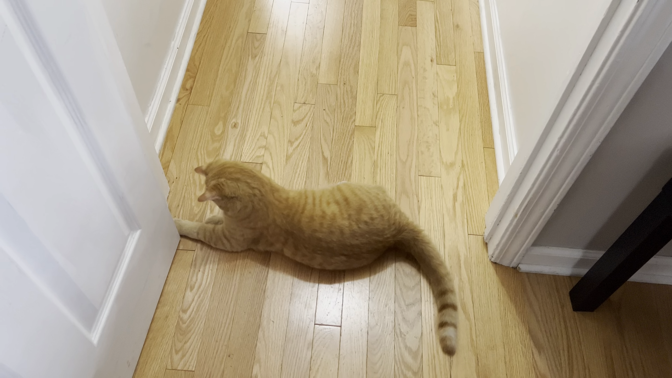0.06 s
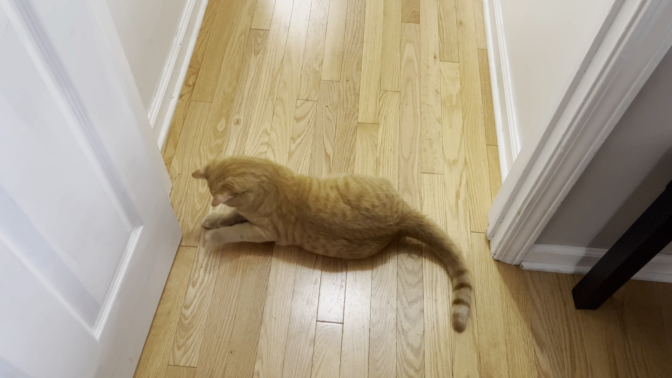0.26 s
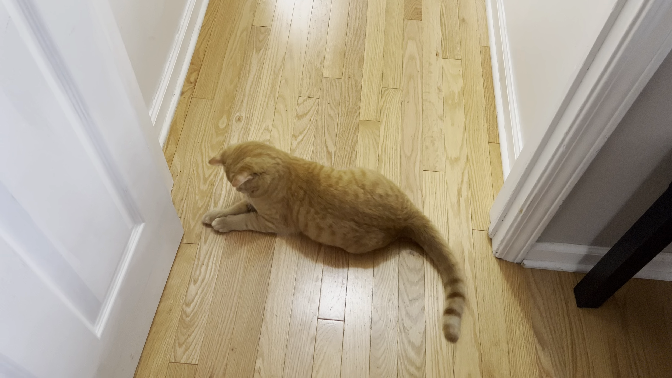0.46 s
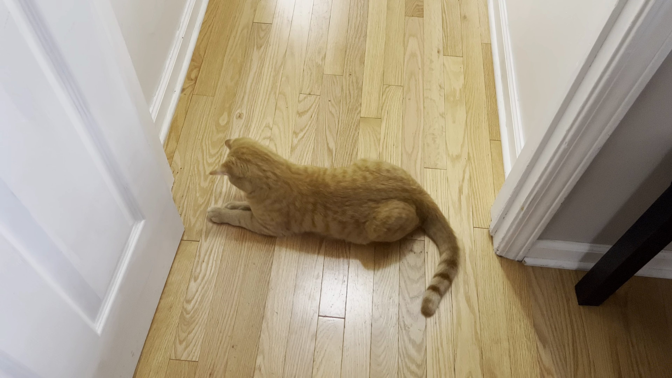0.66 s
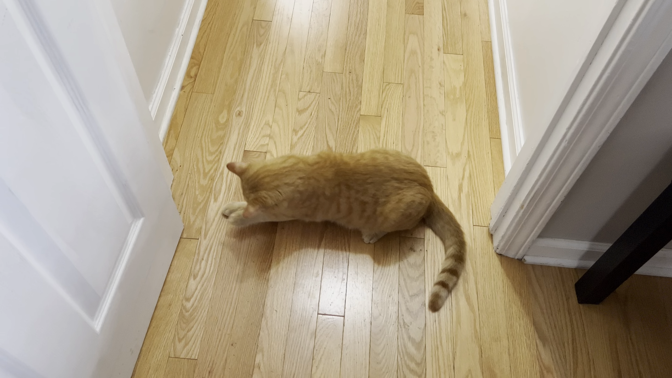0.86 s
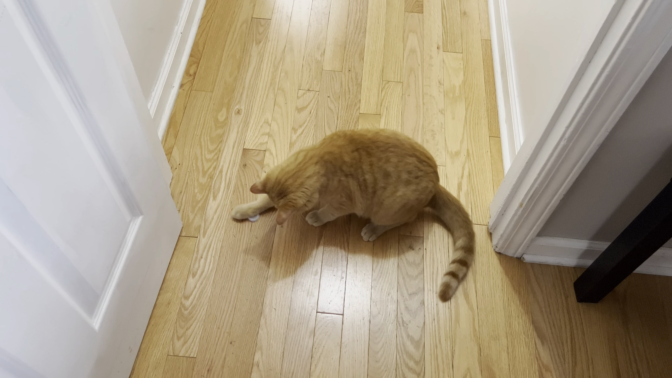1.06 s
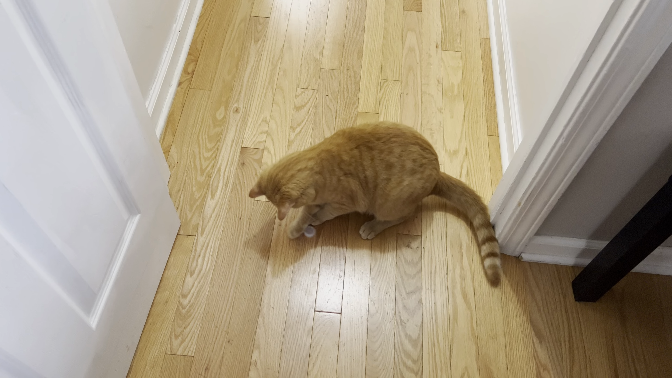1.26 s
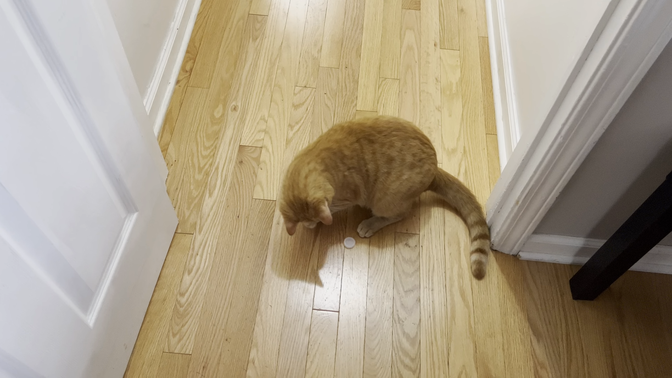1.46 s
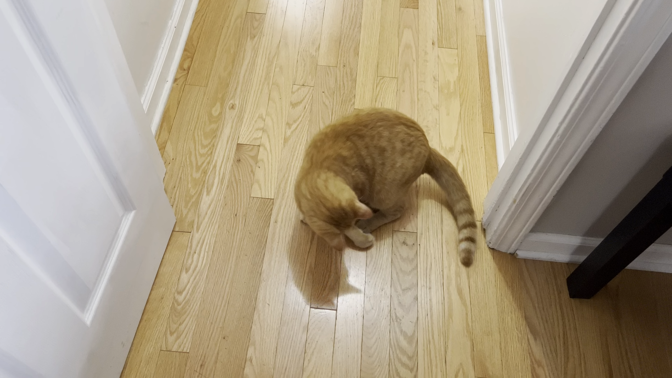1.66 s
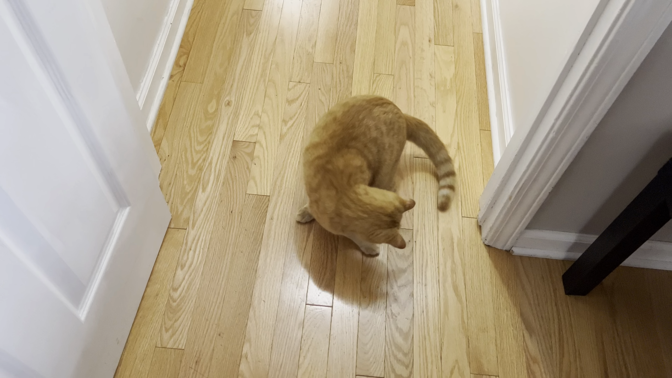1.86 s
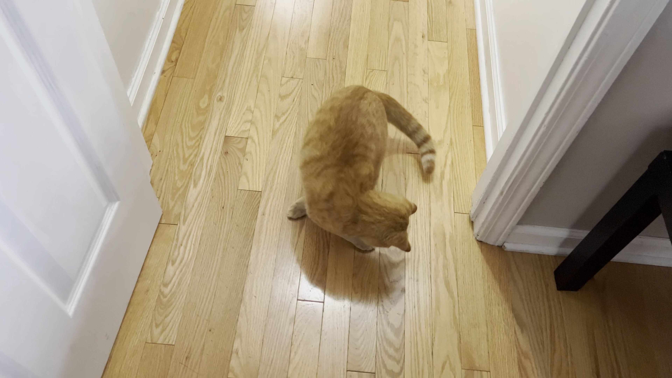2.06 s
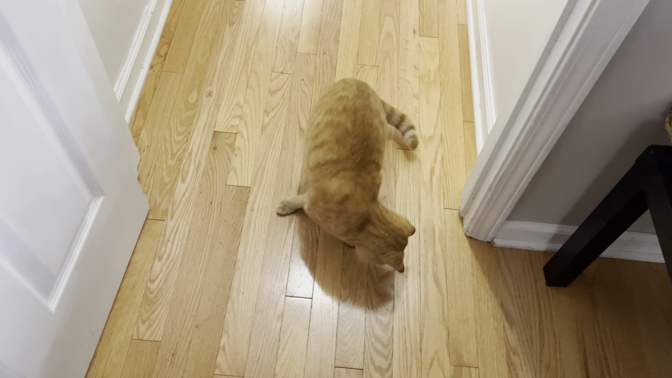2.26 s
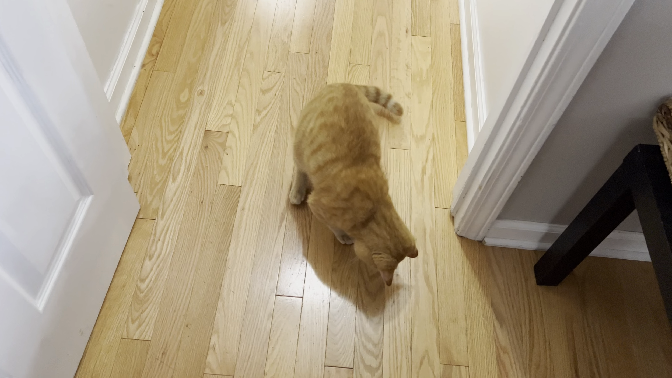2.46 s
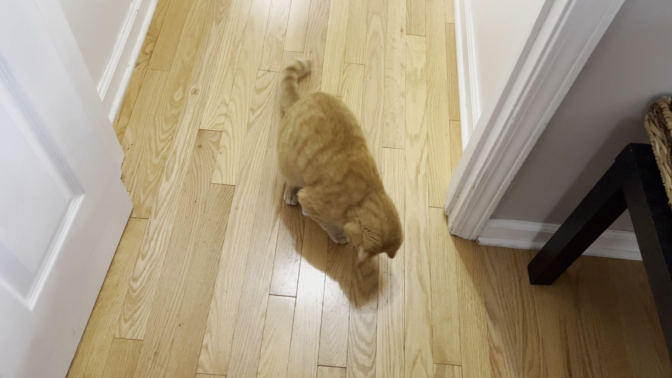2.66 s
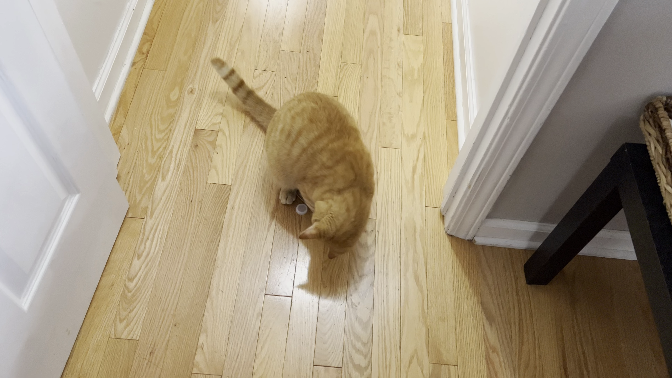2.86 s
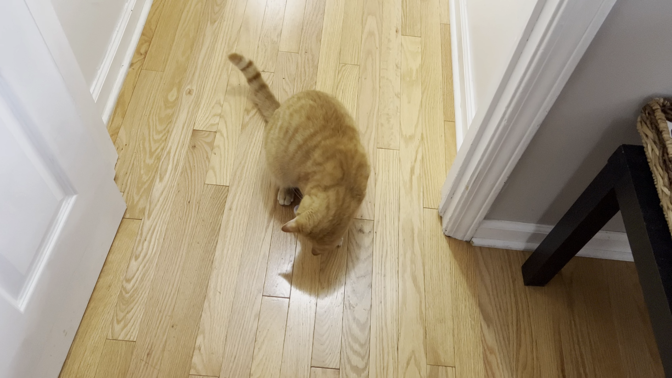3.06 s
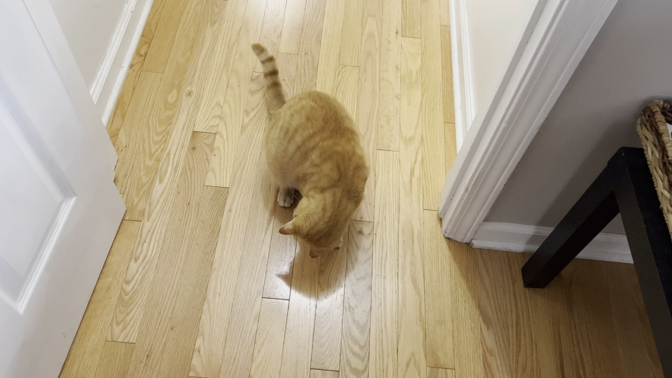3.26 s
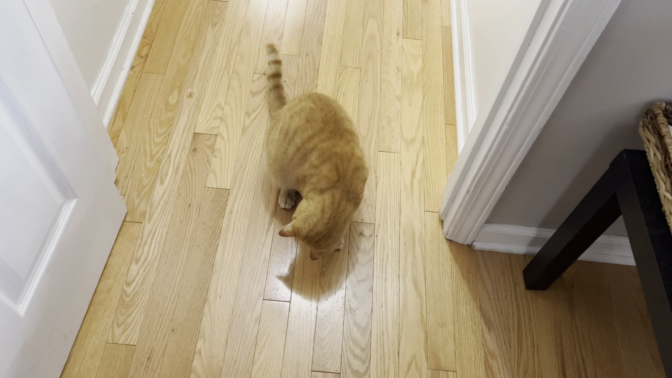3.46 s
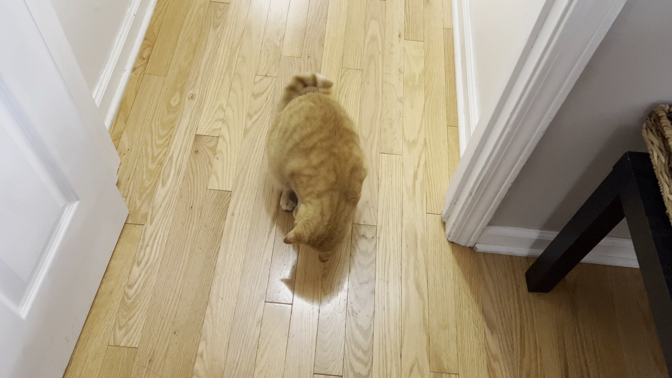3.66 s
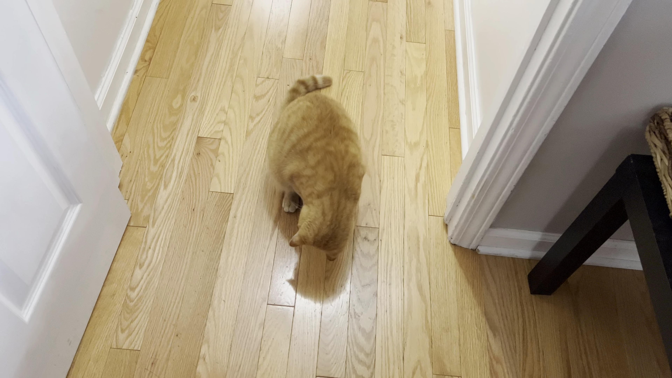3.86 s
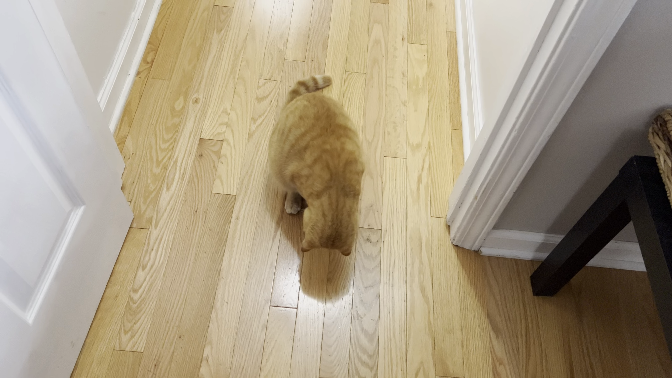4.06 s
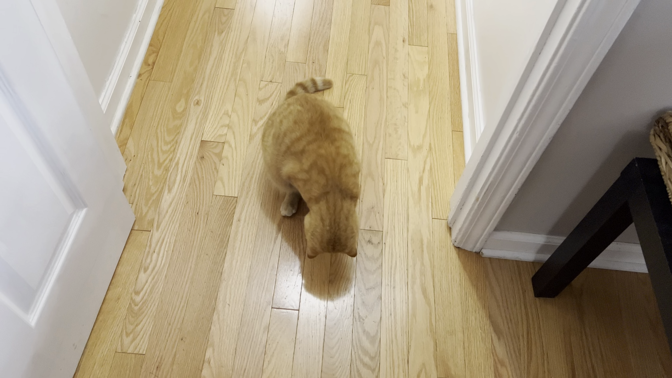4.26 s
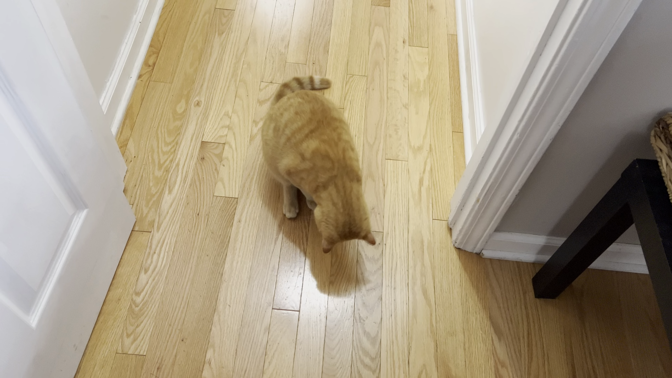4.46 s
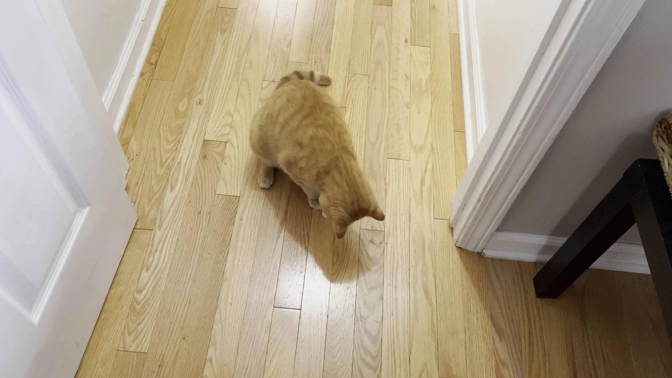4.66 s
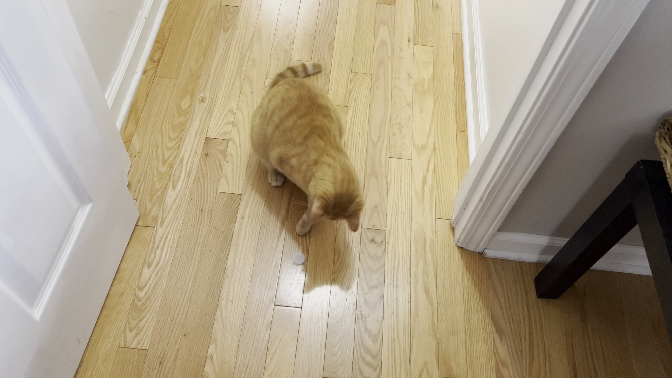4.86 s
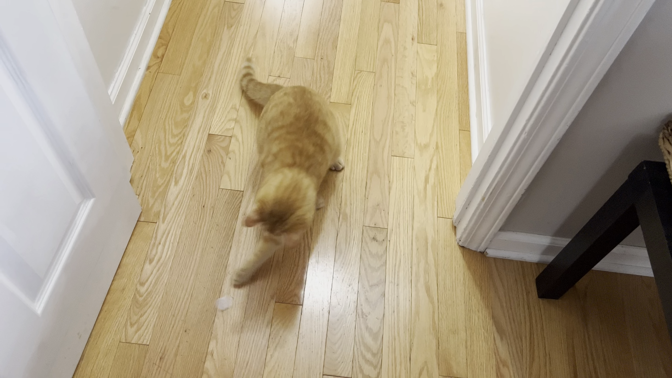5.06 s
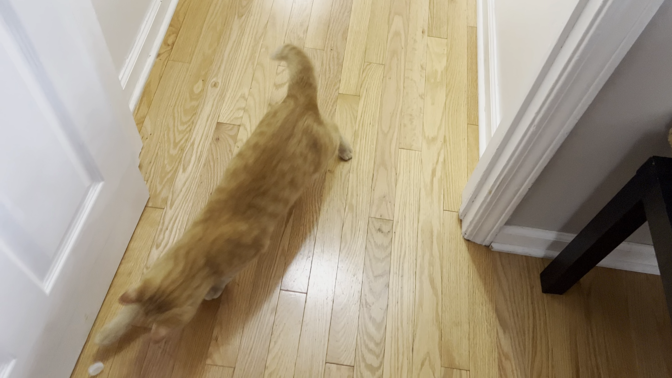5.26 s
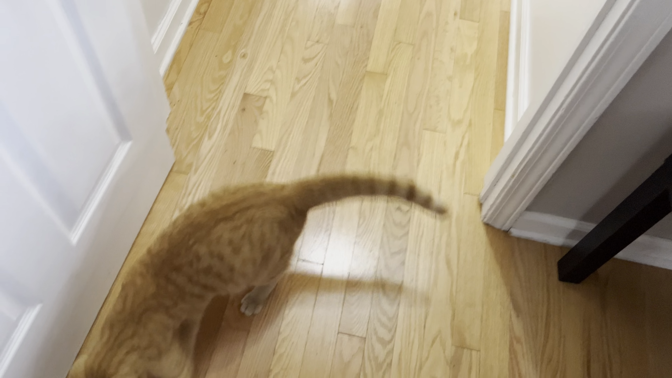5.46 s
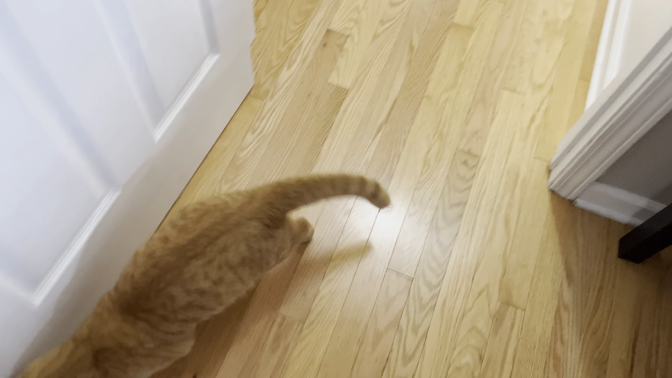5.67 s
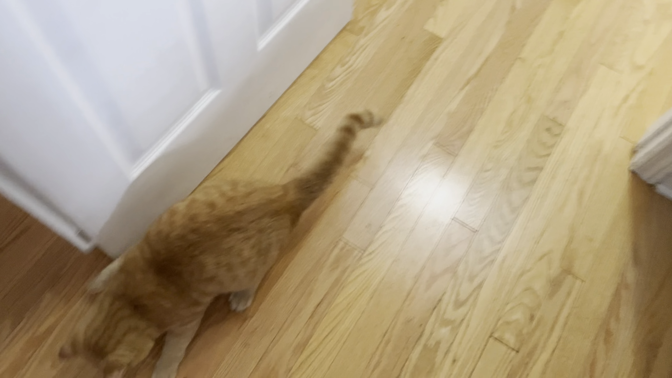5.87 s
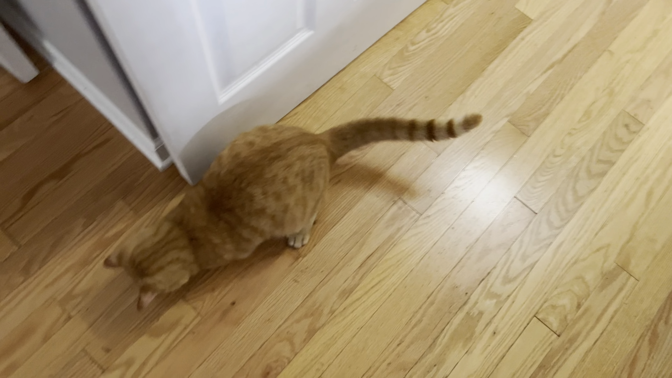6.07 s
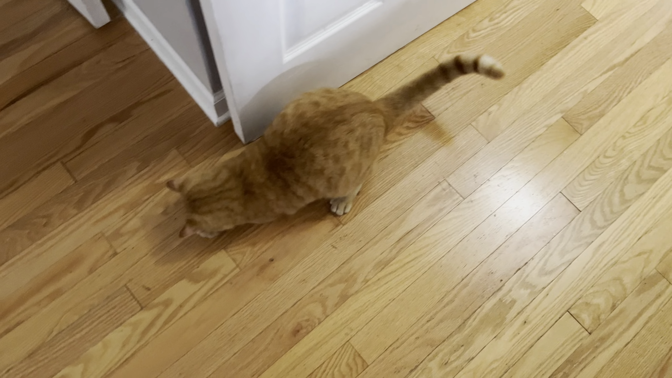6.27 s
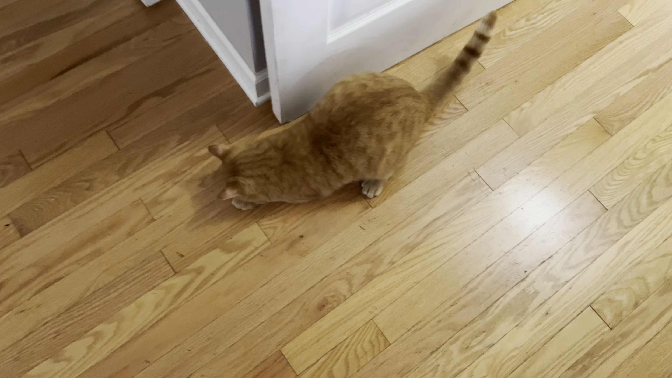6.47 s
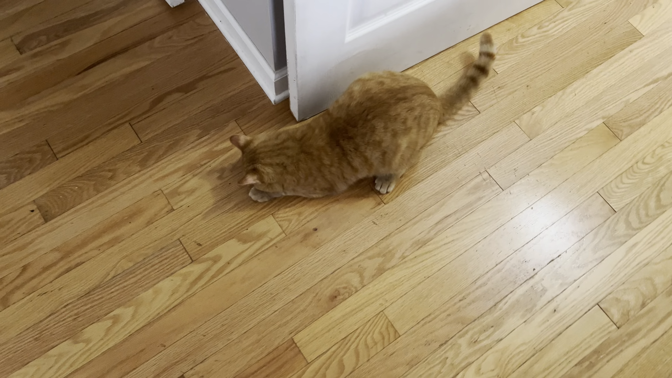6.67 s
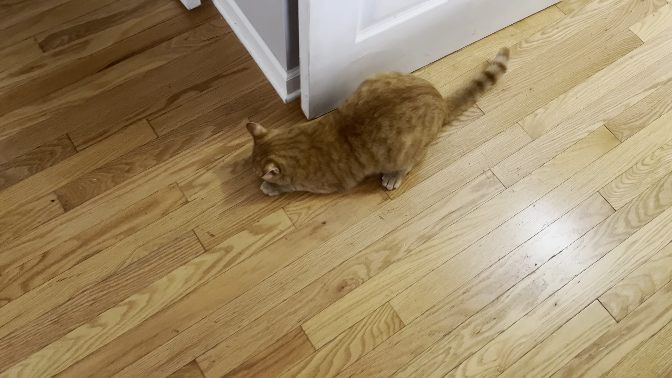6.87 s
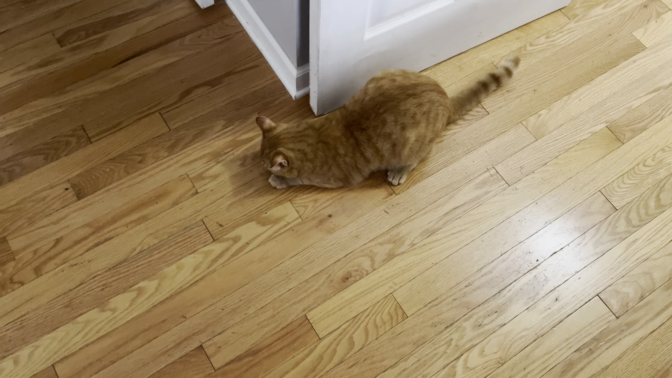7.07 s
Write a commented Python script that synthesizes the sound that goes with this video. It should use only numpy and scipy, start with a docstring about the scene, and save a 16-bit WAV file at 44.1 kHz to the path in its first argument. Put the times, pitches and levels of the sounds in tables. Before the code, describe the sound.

Indoors on bare floorboards, close to a handheld microphone, claws click and drag in brief bursts as a cat bats a hard plastic cap. The clicks are sparse and dry, with a short hallway echo. Late on, the cap skitters with a high ringing rattle and heavy paws drum on the wood in a pounce, followed by a few muted thuds and faint scuffs over low rumble and hiss.

```python
"""Cat and cap on a hardwood floor

A cat bats a small plastic cap about a hardwood hallway, near a hand-held phone. Claws tick and drag on the
boards as short blows and dense slips; the cap rattles and slides as a set of resonances; paws thump
in a pounce as damped low swings. The hallway answers with briefly decaying noise.
The house rumbles, the boards flex, and a fan hisses and whines as steady noise and a tone."""
import sys
import numpy as np
from scipy import signal
from scipy.fft import rfft, irfft, next_fast_len
from scipy.io import wavfile
from scipy.ndimage import map_coordinates

SR = 44100
rng = np.random.default_rng(int(sys.argv[2]) if len(sys.argv) > 2 else 0)


def waveform_to_disk(signal):
    """Save audio, clipped to [-1, 1], as 16-bit WAV at the path in sys.argv[1]."""
    frames = np.transpose(np.atleast_2d(signal))
    scaled = np.clip(frames, -1, 1) * 32767
    samples = np.round(scaled).astype(np.int16)
    wavfile.write(sys.argv[1], SR, samples)


N = 313917  # samples
TOP_HZ = 16600  # band limit
TICK_WET_DB = -6  # ticks' drive of the hallway

# Paw thumps. Each row: start in seconds, nominal level in dB, pitch in Hz, t60 in seconds,
# hollow knock in dB relative to that level before a fixed trim.
THUMPS = [(0.191, -59, 293, 0.33, -21), (0.324, -40, 153, 0.14, -16), (0.465, -55.5, 293, 0.53, -26),
          (0.53, -63, 293, 0.36, -28), (0.687, -46, 158, 0.16, -15), (0.71, -53, 293, 0.44, -22),
          (0.789, -56, 293, 0.39, -27), (0.85, -61.5, 293, 0.24, -30), (2.193, -54, 178, 0.34, -34),
          (2.213, -59, 230, 0.19, -30), (2.439, -54, 138, 0.39, -18), (2.905, -55, 230, 0.11, -32),
          (2.93, -55.5, 145.5, 0.18, -38), (3.415, -58, 181, 0.11, 2), (3.753, -58, 153, 0.087, 8.5),
          (3.775, -56.5, 118, 0.12, -1), (4.3, -53, 196, 0.13, -35), (4.325, -44, 145, 0.19, -45),
          (4.35, -47.5, 189, 0.14, -41), (4.656, -60.5, 113, 0.21, -27), (5.095, -46.5, 137, 0.12, -40),
          (5.235, -33.5, 370, 0.07, -11), (5.242, -30, 129, 0.07, -7.5), (5.375, -36.5, 219, 0.13, -21),
          (5.444, -32.5, 106, 0.18, -14), (5.451, -32, 278, 0.26, -15), (5.52, -36, 415, 0.068, -9),
          (5.582, -32, 285.7, 0.44, 0.5), (5.611, -27, 328, 0.17, -15), (5.666, -31, 111, 0.09, -15),
          (5.688, -36, 190, 0.19, -19), (5.781, -45, 389, 0.086, -5.5), (5.853, -37.5, 120, 0.086, -37),
          (5.87, -28.5, 149, 0.087, -45), (5.897, -50, 149, 0.17, -19), (5.938, -28.5, 222, 0.044, -13.5),
          (6.03, -41, 60.5, 0.25, -35), (6.291, -53, 60, 0.46, -31), (6.591, -36, 104, 0.18, -18.5),
          (6.688, -48.5, 367, 0.16, 1), (7.031, -49.5, 139, 0.059, -17)]
# Resonances of the floorboards. Each row: frequency in Hz, width in Hz, relative level in dB.
BOARD_MODES = [(141.4, 10, 4), (183.3, 29, 2.5), (244, 59, 5), (293, 54, 3), (322.2, 17, -4.5),
               (363, 22, -8.5), (457.5, 92, -5.5), (535.5, 27.6, -6), (880, 240, -2.5)]
# Spectrum of claw on wood. Each row: frequency in Hz, relative density in dB per Hz.
CLAW_SPECTRUM = [(290, -59.5), (500, -8.5), (642, -22.5), (981, -3.5), (1350, -3.5), (1670, -0.5),
                 (2200, -1.5), (3850, -5.5), (5000, -38.5), (6500, -56), (11000, -120)]
# Spectrum of rustle and crack. Each row: frequency in Hz, relative density in dB per Hz.
CRACK_SPECTRUM = [(2530, -20), (4300, -5.5), (4970, -3), (5320, -9), (6940, -13.5), (10500, -29.5),
                  (13600, -89.5), (22000, -120)]
# Fine treble of a sharp contact. Each row: frequency in Hz, relative density in dB per Hz.
FINE_SPECTRUM = [(8000, -60), (10500, -26), (11500, -13), (12500, -5), (13300, 0), (14200, -6),
                 (15400, -11), (16000, -26), (17000, -70)]
# Stereo width of the sound field. Each row: frequency in Hz, side minus mid in dB.
WIDTH = [(60, -17.5), (200, -14), (380, -5.5), (700, 2.5), (1300, 0.5), (2400, 1.5), (4400, 1.5),
         (6500, 0.5), (9500, 3), (11000, 17.5), (12500, -9), (15000, -16)]


def amp(db):
    """Decibel law: the gain of a level in dB."""
    return 10 ** (np.asarray(db) / 20)


def unit(x):
    """Normalisation by mean power: x at rms 1."""
    return x / np.sqrt(np.mean(x ** 2) + 1e-20)


def along(points, hz):
    """Interpolation of (Hz, value) points on a logarithmic frequency axis."""
    f, v = np.transpose(points)
    return np.interp(np.log(hz + 1), np.log(f + 1), v)


def curve(points):
    """Linear interpolation of (second, value) points, one value per sample."""
    s, v = np.transpose(points)
    return np.interp(np.arange(N) / SR, s, v)


def filtered(x, response):
    """Linear filtering: the spectrum of x times a complex response of frequency."""
    m = next_fast_len(N + SR // 2)
    return irfft(rfft(x, m) * response(np.fft.rfftfreq(m, 1 / SR)), m)[..., :N]


def through(x, h):
    """Convolution of x with an impulse response along time."""
    return signal.fftconvolve(np.atleast_2d(x), h[None], axes=1)[:, :N]


def causal(points, size=2048):
    """Minimum-phase impulse response of a spectrum by folding its cepstrum, at energy 1."""
    magnitude = amp(along(points, np.fft.rfftfreq(size, 1 / SR)))
    cepstrum = irfft(np.log(magnitude + 1e-5))
    cepstrum[1:size // 2] *= 2
    cepstrum[size // 2 + 1:] = 0
    h = irfft(np.exp(rfft(cepstrum)))
    return h / np.linalg.norm(h)


def ringing(modes, size=4096):
    """Modal superposition: damped sines of alternating sign, the wider the faster to decay, at energy 1."""
    t = np.arange(size) / SR
    h = np.zeros(size)
    for k, (hz, width_hz, db) in enumerate(modes):
        decay = np.exp(-np.pi * width_hz * t)
        h += (-1) ** k * amp(db) * np.sqrt(width_hz) * decay * np.sin(2 * np.pi * hz * t)
    return h / np.linalg.norm(h)


def noise(spectrum, width, db=0):
    """Coloured Gaussian noise, unrelated in mid and side; the mid's level may change in time."""
    white = rng.standard_normal((2, N))

    def colour(hz):
        mid_db = along(spectrum, hz)
        return amp([mid_db, mid_db + along(width, hz)])

    return filtered(white * amp(db), colour) / np.std(filtered(white, colour)[0])


def envelopes(start, hold, rise, fade, size=16):
    """Exponential relaxation, one row per event: it rises, holds and fades, in steps of size samples."""
    age = np.arange(0, N, size) / SR - start[:, None]
    hold, rise, fade = (np.reshape(v, (-1, 1)) for v in (hold, rise, fade))
    rising = 1 - np.exp(-np.maximum(age, 0) / rise)
    fading = np.exp(-np.maximum(age - hold, 0) / fade)
    return np.repeat(rising * fading, size, axis=1)[:, :N]


def house():
    """Stationary noise and tone: rumble and flexing boards of uneven level, steady fan hiss and thin whine."""
    # Rumble spectrum. Each row: frequency in Hz, relative density in dB per Hz.
    rumble_spectrum = [(13, -40.5), (22, -31.5), (33, -12.5), (49, 6.5), (64, 5), (108, -7), (130, -18),
                       (170, -20), (290, -120)]
    # House rumble. Each row: time in seconds, level in dB before its waver.
    rumble_levels = [(0.0, -66.5), (0.1, -60.5), (0.63, -54), (1.01, -57), (1.07, -63.5), (1.15, -52),
                     (1.49, -63), (1.9, -55), (1.96, -59.5), (2.7, -58), (2.91, -69), (2.95, -56),
                     (3.05, -66), (3.09, -55.5), (3.25, -64), (5.41, -58.5), (5.47, -47), (5.59, -61),
                     (5.67, -46), (5.79, -65), (5.89, -43.5), (6.24, -69), (6.32, -49.5), (6.56, -65),
                     (6.6, -53), (6.9, -65), (7.04, -62.5), (7.12, -67)]
    # Boards flexing as the cat shifts. Each row: time in seconds, level in dB before a fixed trim.
    weight_levels = [(0, -66.5), (.5, -56), (.85, -67), (1.0, -65), (1.4, -74), (1.9, -68.5), (2.6, -77),
                     (3.3, -83.5), (4.1, -78.5), (4.7, -78), (5.0, -80), (5.3, -55), (5.65, -44),
                     (6.0, -45), (6.2, -62), (6.5, -53), (6.75, -48), (6.92, -77), (7.12, -51)]
    # Fan and microphone hiss. Each row: frequency in Hz, relative density in dB per Hz.
    hiss_spectrum = [(71, -14.5), (120, -1.5), (167, -13), (227, -8.5), (372, -16), (610, -21.5),
                     (797, -24), (999, -11), (1250, -15), (1740, -3), (3100, -31), (4050, -23),
                     (4580, -31.5), (7350, -30.5), (16400, -55.5)]
    # Stereo width of the hiss. Each row: frequency in Hz, side minus mid in dB.
    hiss_width = [(60, -10.5), (110, 1.5), (200, -3), (380, -2.5), (700, 3.5), (1290, -1.5), (2380, 1.5),
                  (4400, -2.5), (8120, 1), (15000, -0.5)]
    # Fan whine. Each row: frequency in Hz, nominal level in dB.
    whine_tones = [(3957, -88.5)]
    waver_db, wavers_per_s, hiss_db = 1.5, 9, -70.5
    flex_db, flex_rise_s, flex_fade_s = -3, 0.0042, 0.039  # each thump flexes the boards; fade to 1/e

    waver = map_coordinates(rng.standard_normal(200), [np.arange(N) * wavers_per_s / SR])
    rumble = noise(rumble_spectrum, WIDTH, curve(rumble_levels) + waver_db * waver)

    start, thump_db = np.transpose(THUMPS)[:2]
    thump_energy = amp(thump_db + flex_db) ** 2 @ envelopes(start, 0, flex_rise_s, flex_fade_s) ** 2
    flex = np.sqrt(amp(curve(weight_levels)) ** 2 + thump_energy)
    creak_force = noise([(60, -44), (120, -0.5), (380, 0.5), (700, -3), (1500, -21.5)], WIDTH)
    boards = through(creak_force, ringing(BOARD_MODES))
    boards = amp(-8.0) * flex * boards / np.std(boards[0])

    phase = [[0], [1.3]]  # radians, mid and side
    whine = sum(amp(db + 2.5) * np.sin(2 * np.pi * hz * np.arange(N) / SR + phase) for hz, db in whine_tones)
    return rumble + boards + noise(hiss_spectrum, hiss_width, hiss_db) + whine


def scratches(pitch_hz, rate=650, cycles=1.84, spread=0.17, size=256):
    """Stick-slip: claw tips catch in the grain, giving short damped chirps scattered about a moving pitch."""
    start = np.sort(rng.integers(0, N, round(rate * N / SR)))  # rate per second
    bend, strength = rng.standard_normal((2, len(start), 1))
    age = np.arange(size) / SR * pitch_hz[start, None] * np.exp(spread * bend)  # in cycles
    chirps = strength * np.sin(2 * np.pi * age) * age * np.exp(-age / cycles)
    place = start[:, None] + np.arange(size)
    return unit(np.bincount(place.ravel(), chirps.ravel())[:N])


def drag():
    """Sliding friction: dense slips of uneven size over a smooth rub; the dull sound and the force on the cap."""
    # Strokes of claw and cap over the boards. Each row: start in seconds, hold in seconds,
    # claw level in dB, scratch pitch in Hz, then in dB relative to the claw cap ring, fur rustle
    # and fine treble, all levels before fixed trims.
    strokes = [(0.0, 0.066, -55, 2200, -6.5, -15.5, -24), (0.03, 0.017, -58, 2050, 3, -10, -25),
               (0.213, 0.047, -57.5, 2280, -10, -19.5, -28), (0.32, 0.042, -59, 1860, -11, -19, -22),
               (0.522, 0.044, -59.5, 1900, -10, -21, -24), (0.638, 0.021, -51.5, 2050, -4, -14.5, -27),
               (1.008, 0.014, -56, 2180, -21.5, -16, -22), (1.051, 0.061, -42.5, 2540, -4.5, -11.5, -27),
               (1.093, 0.016, -41, 2420, -4, -8.5, -26), (1.128, 0.036, -44.5, 3250, 0, -10, -35),
               (1.173, 0.026, -48.5, 2100, -6, -11, -23), (1.217, .06, -52, 1980, -8, -12, -24),
               (1.314, 0.053, -54.5, 1990, 0.5, -21, -18.5), (1.391, 0.11, -59, 1660, -8, -26, -24),
               (1.628, .02, -56.5, 1785, -15, -19, -16), (1.646, 0.0087, -47.5, 1750, -1.5, -16.5, -31),
               (1.777, 0.011, -55, 3090, 5, -3, -15), (1.827, 0.012, -43.5, 2990, -3, -8.5, -20),
               (1.86, 0.11, -61, 1850, -10, -20, -32), (2.459, 0.056, -49, 1967, -4, -16, -30),
               (2.626, 0.0049, -49.5, 1616, -5, -13.5, -23), (2.666, 0.053, -68, 1760, 7, -21, -23),
               (3.608, 0.016, -49, 2300, -7.5, -13.5, -31), (3.678, 0.014, -60.5, 2050, 4, -8, -25),
               (3.71, 0.04, -61, 2050, -15, -21, -35), (4.067, 0.1, -64, 2210, -2.5, -17, -26),
               (4.616, 0.013, -63, 1645, -4, -38, -36), (4.69, .09, -62.5, 1668, 2, -22, -17),
               (4.776, 0.0833, -57.5, 1760, -0.5, -21, -20), (4.913, 0.042, -56.5, 1900, -5.5, -38, -21),
               (5.023, .012, -49, 2280, -14, -13, -18), (5.069, 0.046, -54.5, 2450, 10, -4.5, -4.5),
               (5.179, 0.0084, -43.5, 2780, 3, -9.5, -13), (5.2, .025, -55, 2700, 16, -18, -18),
               (5.221, 0.016, -41, 2530, 10, -4, -28), (5.321, 0.053, -54, 2300, 5, -6.5, -16.5),
               (5.438, 0.031, -53.5, 2230, 4.5, -9.5, -12), (5.517, 0.0093, -46.5, 1965, -2, -11.5, -18),
               (5.573, 0.078, -50, 2040, -12, -5, -6), (5.776, 0.011, -46, 2410, 4.5, -7, -22),
               (5.838, 0.072, -55, 2050, 2.5, -11, -19), (5.942, 0.039, -53.5, 2200, 4, -7, -8),
               (6.047, 0.096, -62.5, 1950, 1.5, -17, -17), (6.163, 0.15, -67.5, 1760, -1.5, -9, -12),
               (6.352, 0.033, -67, 1720, -14, 0, -7), (6.44, 0.035, -69, 1800, -20, -8, -7),
               (6.485, 0.056, -59.5, 1610, -25, -2.5, -15), (6.586, 0.12, -63.5, 1710, -28, -3.5, -3.5),
               (6.662, 0.03, -57, 2050, -26, -1, -13), (6.718, 0.068, -61.5, 1810, -9, -14.5, -27),
               (6.853, 0.16, -88.5, 1710, -14, -16.5, -1), (7.032, 0.1, -71.5, 1760, -21, -13, -7.5)]
    start, hold, db, hz, cap_db, rustle_db, fine_db = np.transpose(strokes)
    slips_per_s = 1600

    size = amp(3 * np.minimum(rng.exponential(size=N), 3))
    slips = (rng.random(N) < slips_per_s / SR) * size * rng.standard_normal((4, N))
    force = unit(unit(slips) + amp(-1.0) * rng.standard_normal((4, N)))

    # Rise and fade (to 1/e), in seconds, are both slower for a long hold.
    rise, fade = 0.00347 + 0.051 * hold, 0.04 + 0.31 * hold
    energy = envelopes(start, hold, rise, fade) ** 2 + 1e-12
    level = np.sqrt(amp([db, db + rustle_db, db + fine_db, db + cap_db]) ** 2 @ energy)
    pitch_hz = (amp(db) ** 2 * hz) @ energy / level[0] ** 2  # energy-weighted mean

    claw, rustle, fine, cap = force * level * amp([[-9], [-3.5], [-6], [-7.5]])
    dull = amp(-9.0) * level[0] * scratches(pitch_hz) + through(claw, causal(CLAW_SPECTRUM))
    dull = dull + through(rustle, causal(CRACK_SPECTRUM)) + through(fine, causal(FINE_SPECTRUM))
    return dull, cap


def ticks(spread=.0012, cycles=1.6):
    """Impact excitation: a short rough blow with a few cycles of its own pitch; rows are sound and its lean."""
    # Ticks of claw or cap. Each row: start in seconds, nominal level in dB, click pitch in Hz,
    # then in dB relative to that level, before fixed trims, cap ring, crack and fine treble.
    tick_rows = [(0.0507, -47, 2120, -25, -1.5, -11), (0.2226, -54, 2400, -5, -25, -31),
                 (0.2534, -50, 1700, -15, -22, -42), (0.3317, -51, 2020, -6, -10, -20),
                 (0.5414, -55.5, 1700, -14, -18, -26), (0.6493, -51.5, 2400, -6, 6, -18),
                 (1.035, -39.5, 1690, -23, -8.5, -24), (1.059, -26, 3200, -12, -12, -30),
                 (1.0656, -29.5, 2370, -25, -25, -33), (1.1054, -31, 2280, -26, -14, -23),
                 (1.241, -39, 1800, -24, -23, -37), (1.3136, -41, 1720, 6, -32, -19),
                 (1.3361, -40.5, 2240, 4.5, -31, -18.5), (1.6345, -48, 1590, -18, -24, -22),
                 (1.6579, -41.5, 1430, -25, -33, -35), (1.7958, -27, 3240, -5, -41, -24),
                 (1.7995, -42.5, 2700, 10, -28, -12.5), (1.8377, -30, 2880, -11, -3.5, -25),
                 (1.8465, -29.5, 3300, -14, -27, -22), (2.472, -46.5, 2300, -25, -17, -15),
                 (2.6356, -37, 1610, 0.5, -21, -44), (2.6586, -38.5, 2400, 4, -33, -27),
                 (3.6153, -35.5, 2480, -16, -24, -29), (3.6284, -40, 2030, -29, -24, -38),
                 (3.681, -35, 2070, -8, -11, -31), (4.0884, -42, 2260, -1, -13, -18),
                 (4.168, -48, 1840, -2.5, -28, -44), (4.643, -49.5, 1590, -17, -34, -47),
                 (4.7463, -47.5, 1560, 6.5, -33, -21), (4.809, -46, 1540, 1.5, -20, -20),
                 (4.882, -49.5, 1440, -19, -28, -23), (5.031, -32.5, 2260, -15, -31, -21),
                 (5.0388, -32.5, 2200, -5, -28, -25), (5.0544, -46, 1720, 10, -16, -2),
                 (5.0898, -40.5, 1770, 2, -8, 0.5), (5.13, -37, 2580, -22, -42, -33),
                 (5.1467, -34, 2500, -0.5, -33, -17.5), (5.157, -32.5, 2840, -17.5, -12, -27),
                 (5.165, -35, 2670, 4, -36, -28), (5.1938, -33, 3000, 0.5, 0.5, -8),
                 (5.211, -34.5, 2830, 8, -7.5, -30.5), (5.2354, -21.5, 3670, 4.5, 0, -39),
                 (5.2464, -42, 2260, 19.5, -16.5, -48), (5.3412, -49.5, 2740, 16, -29, -27),
                 (5.374, -49.5, 1880, 8.5, 6, -4), (5.458, -51, 1800, 8.5, -16, -15),
                 (5.5255, -44.5, 1230, 11.5, -28.5, -24.5), (5.5376, -45, 1380, -13.5, -13, -6),
                 (5.5802, -21.5, 2380, -23, -8, -16), (5.7816, -40.5, 1580, 13.5, 1.5, -12),
                 (5.873, -46, 2310, 12.5, -27, -38), (5.9328, -42, 3180, -9, -17, -34),
                 (5.942, -46.5, 3210, -7, 2.5, -48), (5.9655, -42, 3400, 6.5, -22, -34),
                 (6.0614, -52.5, 2200, -12, -26, -26), (6.5007, -51.5, 1700, 1, 6, -7),
                 (6.6845, -42, 1960, -26.5, -14, -16), (7.021, -61, 2000, -26, -4, 2)]
    lean_db, lean_scatter_db = 1.5, 2  # left over right: mean and standard deviation
    force, t = np.zeros((5, 2, N + SR)), np.arange(SR // 50) / SR
    blows = rng.standard_normal((len(tick_rows), len(t))) * np.exp(-t / spread)
    pans_db = lean_db + lean_scatter_db * rng.standard_normal(len(tick_rows))
    for (s, db, hz, cap_db, crack_db, fine_db), blow, pan_db in zip(tick_rows, blows, pans_db):
        blow = blow / np.linalg.norm(blow)
        age = t * hz / cycles
        click = np.sin(2 * np.pi * hz * t) * age * np.exp(1 - age)  # swells over a cycle or two
        shapes = np.array([click, blow, blow, blow, t == 0])  # the cap is struck by an impulse
        side = (amp(pan_db) - 1) / (amp(pan_db) + 1)
        gains = amp(db + np.array([-4, 4, crack_db + 10.5, fine_db + 16.5, cap_db + 12]))
        levels = np.outer(gains, [1, side])
        force[..., round(s * SR):][..., :len(t)] += levels[..., None] * shapes[:, None]
    click, claw, crack, fine, cap = force[..., :N]
    dull = click + through(claw, causal(CLAW_SPECTRUM))
    dull = dull + through(crack, causal(CRACK_SPECTRUM)) + through(fine, causal(FINE_SPECTRUM))
    return dull, cap


def hall(x, gap=0.0011):
    """Statistical reverberation: energy in each band decays exponentially as unrelated mid and side noise."""
    # Decay of the hallway. Each row: frequency in Hz, t60 in seconds.
    decay_times = [(300, 0.67), (2000, 0.17), (5000, 0.037), (14000, 0.1)]
    delayed = np.pad(x, (round(gap * SR), 0))[:N]  # gap in seconds
    hz, t, z = signal.stft(delayed, SR, nperseg=256, noverlap=192)
    keep = amp(-120 * (t[1] - t[0]) / along(decay_times, hz))  # energy kept per frame: amplitude squared
    bands = zip(keep, np.abs(z) ** 2)
    energy = np.array([signal.lfilter([1 - k], [1, -k], row) for k, row in bands])
    field = signal.stft(rng.standard_normal((2, N)), SR, nperseg=256, noverlap=192)[2]
    field *= np.sqrt(energy / np.mean(np.abs(field) ** 2))
    tail = signal.istft(field, SR, nperseg=256, noverlap=192)[1][:, :N]
    return filtered(tail, lambda hz: amp([0 * hz, along(WIDTH, hz)]))


def thumps(push=0.0041, knock_push=.006):
    """Damped oscillation: a soft pad gives a low swing, rings the boards and adds a short hollow knock."""
    # Spectrum of the hollow knock. Each row: frequency in Hz, relative density in dB per Hz.
    knock_spectrum = [(200, -33.5), (400, 3), (600, 0), (900, -5), (1400, -12.5), (2500, -38.5)]
    out, t = np.zeros(N + SR), np.arange(SR // 2) / SR
    pushes = rng.standard_normal((len(THUMPS), len(t)))
    board_ring, knock_ring = ringing(BOARD_MODES), causal(knock_spectrum)

    def peak(x):
        return x / np.abs(x).max()

    for (s, db, hz, t60, knock_db), shove in zip(THUMPS, pushes):
        swing = np.sin(2 * np.pi * hz * t) * amp(-60 * t / t60) * (1 - np.exp(-t / 0.0015))
        wood = signal.fftconvolve(shove * np.exp(-t / push), board_ring)[:len(t)]
        knock = signal.fftconvolve(shove * np.exp(-t / knock_push), knock_ring)[:len(t)]
        thump = swing + 0.35 * peak(wood) + amp(knock_db + 2.5) * peak(knock)
        out[round(s * SR):][:len(t)] += amp(db - 3.5) * thump
    return out[:N]


def ports(x, lead_db=-3):
    """Interaural-style cues: a near sound's lean in level, and its phase lead at the left port, as mid and side."""
    mid, *lean = np.atleast_2d(x)
    lead = filtered(mid, lambda hz: 1j * amp(along(WIDTH, hz) + lead_db))
    return np.array([mid, sum(lean) + lead])


def scene():
    """Superposition of near contacts, the hallway's answer and the house, as left and right."""
    # Resonances of the plastic cap. Each row: frequency in Hz, width in Hz, relative level in dB.
    cap_modes = [(3523, 180, 5.5), (3697, 35, 10), (3864, 71, 14), (4296, 68, -4.5), (4640, 200, -33.5)]
    rub, slide, tick, bat = map(ports, (*drag(), *ticks()))
    dull = tick + rub + hall(amp(TICK_WET_DB) * tick[0] + amp(-2.5) * rub[0])
    cap_force = bat + slide + hall(amp(TICK_WET_DB) * bat[0] + amp(-3.5) * slide[0])
    paws = thumps() * amp([[0], [-14]])  # mid and side
    mid, side = dull + through(cap_force, ringing(cap_modes)) + paws + house()
    return np.array([mid + side, mid - side])


def record(dry):
    """Frequency response of the ports: the left hears more bass; nothing is kept above the band limit."""
    def response(hz):
        bass_db = 1.2 / (1 + (hz / 300) ** 2)
        return amp(np.outer([1, -1], bass_db)) * (hz < TOP_HZ)

    return filtered(dry, response)


dry = scene()
out = record(dry)
waveform_to_disk(out)
```